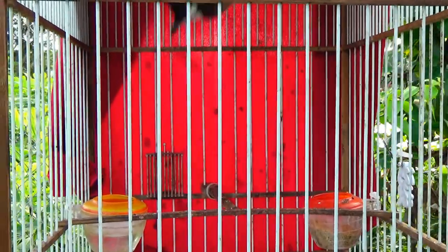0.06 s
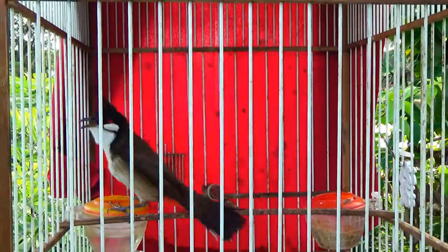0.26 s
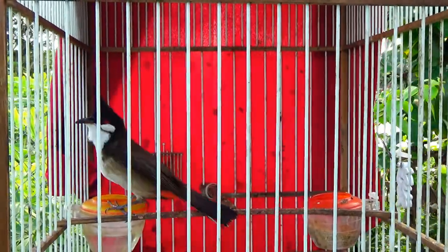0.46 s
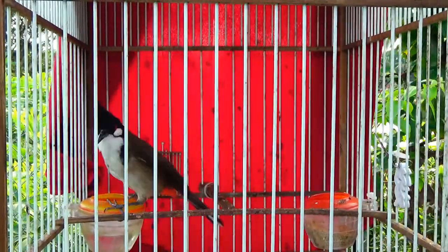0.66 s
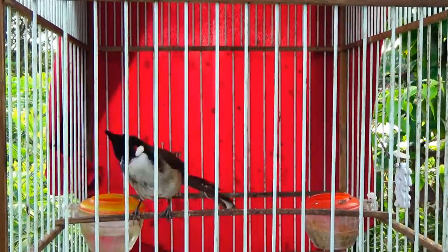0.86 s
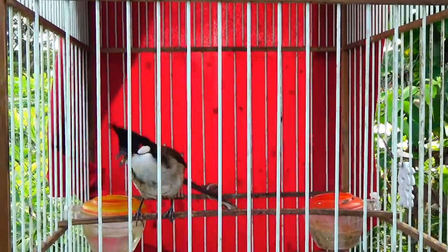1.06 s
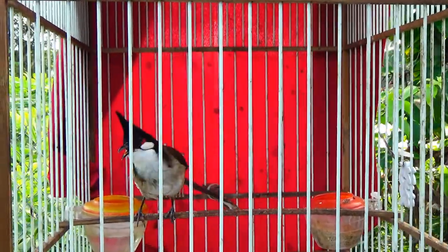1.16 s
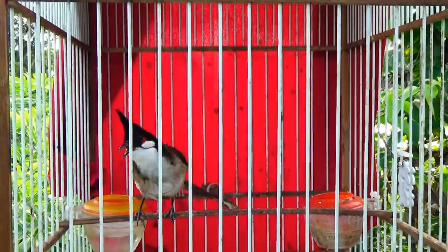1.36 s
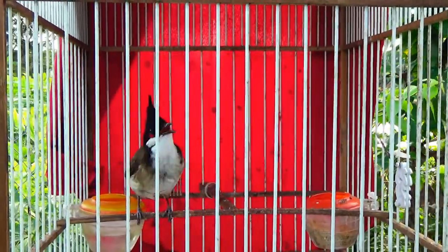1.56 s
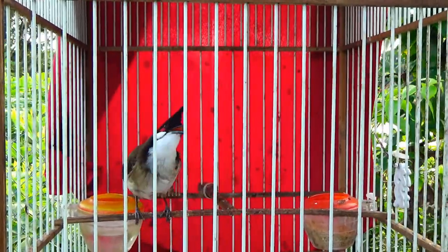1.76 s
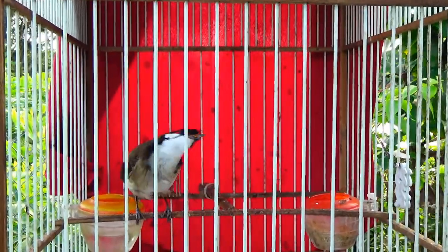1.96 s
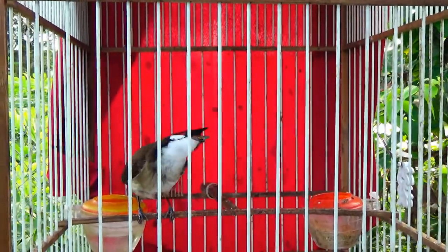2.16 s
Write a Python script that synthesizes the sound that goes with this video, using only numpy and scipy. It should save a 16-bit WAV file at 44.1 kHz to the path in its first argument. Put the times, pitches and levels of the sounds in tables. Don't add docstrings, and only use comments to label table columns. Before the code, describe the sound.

Songbird whistles a fast five-note phrase close by, with perch thuds, feather rustle and faint garden hum

```python
import sys
import numpy as np
from scipy import signal
from scipy.fft import rfft, irfft, next_fast_len
from scipy.io import wavfile
from scipy.ndimage import uniform_filter1d, minimum_filter1d, map_coordinates

SR = 44100
rng = np.random.default_rng(int(sys.argv[2]) if len(sys.argv) > 2 else 0)


def unload_audio(sound):
    columns = np.transpose(np.atleast_2d(sound))
    steps = np.round(np.clip(columns, -1, 1) * 32767)
    wavfile.write(sys.argv[1], SR, steps.astype(np.int16))


def attenuation_scalar(level_db):
    decades = np.asarray(level_db, float) / 20
    return 10 ** decades


N = 97020


def unit(x):
    return x / np.sqrt(np.mean(x ** 2) + 1e-20)


def along(points, hz):
    f, db = np.transpose(points)
    return np.interp(np.log(hz + 1), np.log(f + 1), db)


def wobble(rate):
    knots = rng.standard_normal(int(N * rate / SR) + 4)
    return map_coordinates(knots, [np.arange(N) * rate / SR])


def filtered(x, response):
    m = next_fast_len(x.shape[-1] + 8192)
    spectrum = rfft(x, m) * response(np.fft.rfftfreq(m, 1 / SR))
    return irfft(spectrum, m)[..., :x.shape[-1]]


def rush(spectrum, shape):
    noise = rng.standard_normal(shape)
    return unit(filtered(noise, lambda hz: attenuation_scalar(along(spectrum, hz))))


# f/Hz, level/dB per Hz
TRAFFIC_COLOUR = [(25, -18), (75, 0), (250, -5.5), (700, -10), (1500, -20.5), (4000, -27), (14000, -38),
                  (16000, -50)]
# t/s, level/dB
TRAFFIC_LEVEL = [(0.0, -45), (0.14, -46), (0.27, -49), (0.44, -52.5), (0.67, -51), (0.85, -51),
                 (1.49, -48.5), (1.84, -47.5), (2.2, -46.5)]


def traffic():
    z = signal.stft(rush(TRAFFIC_COLOUR, (2, N)), nperseg=1024)[2]
    patches = uniform_filter1d(rng.standard_normal(z.shape[1:]), size=8, axis=0)
    patches = uniform_filter1d(patches, size=5, axis=1)
    hum = signal.istft(z * attenuation_scalar(1.5 * unit(patches)), nperseg=1024)[1][:, :N]
    s, db = np.transpose(TRAFFIC_LEVEL)
    return hum * attenuation_scalar(np.interp(np.arange(N) / SR, s, db) + .6 * wobble(13))


# f/Hz, width/Hz, level/dB
WHINES = [(130.5, 25, -60), (241, 17, -60.5), (1230, 31.1, -75.5), (2389, 23, -69.5), (4740, 310, -61),
          (6200, 1100, -70.5)]


def whines():
    out = np.zeros(N)
    for hz, wide, db in WHINES:
        noise = rng.standard_normal(N)
        band = filtered(noise, lambda f: 1 / (1 + ((f - hz) / wide * 2) ** 4))
        out += attenuation_scalar(db + 0.88 * wobble(2.0)) * unit(band)
    return out


# centre t/s, length/s, f/Hz, level/dB
YAPS = [
    (0.509, 0.055, 420.6, -56.5),
    (1.427, 0.14, 429, -58),
    (1.744, .05, 425, -62.5),
]
YAP_HARMONICS = [5, 2.5, 2, -13.5, -10.5, -9.5, -13]


def dog():
    out, t = np.zeros(N), np.arange(N) / SR
    for at, long, hz, yap_db in YAPS:
        phase = 2 * np.pi * np.cumsum(hz * (1 - .3 * (t - at)) + 8 * wobble(60)) / SR
        stack = sum(attenuation_scalar(db) * np.sin((k + 1) * phase) for k, db in enumerate(YAP_HARMONICS))
        rasp = attenuation_scalar(4) * rush([(300, -24.0), (800, -1.5), (2800, -7.5), (5000, -28.0)], N)
        out += attenuation_scalar(yap_db) * np.exp(-((t - at) / long * 2) ** 2) * (stack + rasp)
    return out


# f/Hz, left over right level/dB
GARDEN_LEAN = [(30, 4), (110, 1.5), (300, 3), (800, 3.5), (2300, -0.5), (4400, 0.7), (7000, 2.5),
               (11000, 1)]


def garden():
    mid, side = traffic()
    mid = mid + whines() + dog()
    sides = np.array([[1], [-1]])
    leaning = filtered(mid, lambda hz: attenuation_scalar(along(GARDEN_LEAN, hz) / 2 * sides))
    return leaning + attenuation_scalar(-24) * side * sides


# delay t/s, level/dB
WALLS = [(.0045, -36.5), (.009, -29), (.014, -20.5), (.021, -26.5), (.026, -26.5)]
# f/Hz, level/dB
ECHO_COLOUR = [(300, 13), (1950, -7.5), (2350, -13), (3050, -5.5), (3400, -3), (4200, -8.5), (7000, -12),
               (16000, -21.5)]


def echoes(x):
    t = np.arange(SR // 2) / SR
    decay = 0
    for db, t60 in [(-22.5, .14), (-32.5, .55)]:
        decay = decay + attenuation_scalar(db - 60 * t / t60) * np.sqrt(6 * np.log(10) / (t60 * SR))
    noise = rng.standard_normal((2, len(t)))
    tail = (noise[0] + 0.15 * noise) * decay * (t > 0.003)
    tail += attenuation_scalar(-74 - 60 * t / 0.33) * np.sin(2 * np.pi * 3090 * t)
    for s, db in WALLS:
        tail[:, round(s * SR)] += attenuation_scalar(db)
    coloured = filtered(x, lambda hz: attenuation_scalar(along(ECHO_COLOUR, hz)))
    return signal.fftconvolve(coloured[None], tail, axes=1)[:, :N]


# centre t/s, length/s, level/dB
RUSTLES = [(0.053, 0.047, -51.5), (0.089, 0.037, -50), (0.153, 0.042, -50), (0.186, 0.01, -54.5),
           (0.21, 0.075, -40.5), (0.269, 0.057, -38.5), (0.317, .012, -50), (0.324, 0.037, -51.5),
           (0.343, 0.019, -49.5), (0.372, 0.024, -51), (0.551, 0.079, -55.5), (0.608, .008, -63),
           (0.773, 0.028, -53), (0.852, 0.11, -58), (.92, .03, -65.5), (1.453, 0.076, -63)]
# f/Hz, level/dB per Hz
FEATHER = [(880, -37.5), (1500, -3), (4320, -1), (4870, 1.5), (10600, -2.5), (16000, -11.5)]


def feathers():
    t = np.arange(N) / SR
    level = sum(attenuation_scalar(db) * np.exp(-((t - s) / long * 2) ** 2) for s, long, db in RUSTLES)
    grain = attenuation_scalar(3 * wobble(90) + 3 * wobble(400))
    return level * unit(grain * rush(FEATHER, N))


# t/s, peak level/dB, t60/s, rise/s, cane ring level/dB
CLAWS = [(0.1958, -13, 0.019, .002, -18), (.1968, -39, 0.006, .0005, -24), (0.198, -16, 0.012, 0.00088, -7),
         (0.23, -23.5, .02, .001, -22.5), (0.24, -35.5, .02, .002, -14), (0.251, -16.5, 0.026, 0.0018, -25),
         (0.2854, -17.5, 0.024, .001, -24), (.784, -25.5, 0.021, .002, -24),
         (0.7898, -12.5, 0.023, 0.00011, -19), (0.8192, -16, .014, 0.00032, -12),
         (0.8256, -19, 0.024, 0.002, -2), (0.8276, -16, 0.026, .001, -8), (.912, -42, 0.048, .004, -20)]
# f/Hz, level/dB per Hz
CLICK = [(1500, -55), (3600, -24), (5000, -9), (6400, -4), (8500, 0), (12000, -2), (14000, -9),
         (16000, -24)]
# f/Hz, level/dB, t60/s
CANE = [(6420, -7, .04), (5500, -18, .015), (8300, -14, .025), (9300, -18, .02), (11500, -18, .015)]


def claws():
    out, t = np.zeros(N), np.arange(SR // 8) / SR
    for s, db, t60, rise, ring_db in CLAWS:
        ring = 0
        for hz, mode_db, long in CANE:
            mode = np.sin(2 * np.pi * hz * (1 + 0.0099 * rng.normal()) * t)
            ring = ring + attenuation_scalar(mode_db + rng.normal(0, 2.1) - 60 * t / long) * mode
        tick = rush(CLICK, len(t)) * attenuation_scalar(-60 * t / t60) + attenuation_scalar(ring_db + 7) * ring
        out[round(s * SR):][:len(t)] += attenuation_scalar(db - 8) * (1 - np.exp(-t / max(rise, 1e-4))) * tick
    return out


# t/s, level/dB, t60/s
LANDING = [
    (0.193, -24.5, 0.015),
    (0.1966, -21, 0.015),
    (.205, -43, 0.03),
    (.212, -42, 0.094),
]
# f/Hz, level/dB per Hz
THUD = [(18, -34), (30, -11.5), (389, -0.5), (1100, -15), (1390, -5), (3000, -16.5), (3900, -23),
        (6600, -120)]


def landing():
    out, t = np.zeros(N), np.arange(SR // 8) / SR
    for s, db, t60 in LANDING:
        thud = np.minimum(t * 1000, 1) * rush(THUD, len(t))
        out[round(s * SR):][:len(t)] += attenuation_scalar(db - 60 * t / t60) * thud
    rumble = rush([(25, -3.0), (130, 0.5), (300, -15), (600, -59.0)], len(t))
    sway = attenuation_scalar(-36 - 60 * t / 0.31) * np.sin(np.pi * t / t[-1]) ** .5 * rumble
    out[round(LANDING[0][0] * SR):][:len(t)] += sway
    return out


def chattering_bar():
    at_s, hz, long_s = .9165, 8200, .016
    puff = np.exp(-((np.arange(N) / SR - at_s) / long_s * 2) ** 4)
    return attenuation_scalar(-53) * puff * rush([(hz * .85, -70), (hz, 0), (hz * 1.15, -70)], N)


# t/s, f/Hz, level/dB
NOTES = [
    [(.237, 2850, -29), (.241, 2913, -20), (.249, 2750, -16.5), (.26, 2867, -12), (.271, 3315, -12.5),
     (.277, 3665, -10), (.284, 3803, -10.5), (.296, 3815, -12), (.301, 3600, -39.5)],
    [(.3785, 2774, -19), (.383, 2684, -15), (.398, 2810, -10.5), (.412, 3210, -12.5), (.426, 3703, -7),
     (.434, 3806, -12), (.439, 3577, -13.5), (.446, 3755, -30), (.452, 3600, -36)],
    [(.5155, 2130, -27), (.521, 2384, -26), (.525, 2104, -18), (.541, 2237, -17), (.545, 1994, -23.5),
     (.549, 2150, -22)],
    [(.546, 2190, -34.5), (.55, 2863, -8.5), (.557, 2863, -7), (.563, 3070, -11.5), (.5765, 3047, -9.5),
     (.5812, 2940, -29), (.585, 3060, -21.5), (.593, 2960, -32)],
    [(.639, 2267, -40.5), (.647, 2307, -20.5), (.657, 2345, -14), (.697, 2378, -16.5), (.706, 2162, -19.5),
     (.72, 2005, -21.5), (.748, 1930, -23.5), (.7595, 1854, -34.5), (.772, 2060, -61)],
]
# warble f/Hz, depth/Hz, dip 0-1, crest t/s, deepest dips t/s, calming t/s
VOICE = [(164, 165, .27, .241, .252, .276), (164, 130, .22, .3828, .385, .42),
         (160, 25, .05, .52, .52, .55), (165, 90, .1, .5592, .556, .57), (130, 25, .26, .7085, .712, .75)]
OVERTONES = [
    [-30, -33, -54, -70, -80, -80],
    [-32, -35, -52, -70, -80, -80],
    [-35, -43, -41, -41, -46, -62],
    [-38, -48, -50, -64, -75, -80],
    [-36, -37, -37, -45, -45, -52],
]
# overtone growth/dB per kHz of pitch, halfway lines level/dB
RICHNESS = [(11, -50), (11, -52), (0, -44), (4, -55), (-13, -41)]
HALFWAY = [-6, 0, -11, -11, -12, -12]
# f/Hz, level/dB per Hz
BREATH = [(700, -24.5), (1400, -9.5), (3300, -2), (6000, -9.5), (13000, -9), (16000, -25)]


def bird():
    out, t = np.zeros(N), np.arange(N) / SR
    breath = attenuation_scalar(-45) * rush(BREATH, N)
    for rows, voice, overtones, (grow_db, half_db) in zip(NOTES, VOICE, OVERTONES, RICHNESS):
        s, hz, db = np.transpose(rows)
        rate_hz, depth_hz, dip, crest, deepest, calms = voice
        turn = 2 * np.pi * rate_hz * (t - crest) + .3 * wobble(80)
        swing = .5 + .5 * np.clip((calms - t) / 0.0037, 0, 1)
        pitch = np.interp(t, s, hz)
        warbled = pitch + depth_hz * swing * np.cos(turn) + 14 * wobble(300)
        phase = 2 * np.pi * np.cumsum(warbled) / SR
        bright_db = grow_db * (pitch - hz.max()) / 1000 + np.minimum(np.interp(t, s, db) + 29, 0)
        tone = (1 + attenuation_scalar(-37.5) * wobble(2500)) * np.sin(phase) + breath
        for k, (over_db, line_db) in enumerate(zip(overtones, HALFWAY)):
            multiple = (k + 2) * pitch
            level = attenuation_scalar(over_db + bright_db + 2.5 * wobble(150)) * (multiple < 14500)
            tone += level * np.sin((k + 2) * phase)
            level = attenuation_scalar(half_db + line_db + (k > 1) * bright_db + 3 * wobble(90))
            tone += level * np.sin((k + .5) * phase)
        gate = np.clip(np.minimum(t - s[0], s[-1] - t) / 0.0029, 0, 1)
        lifted_db = db + 9 * attenuation_scalar(db - db.max())
        fade = 1 / (1 + ((t - deepest) / .016) ** 4)
        dips = np.abs(1 - dip * fade * (1 - np.cos(turn - .3)) ** 2 / 2)
        out += np.sqrt(2) * attenuation_scalar(np.interp(t, s, lifted_db)) * gate * dips * tone
    return out


def lean(left_db):
    return attenuation_scalar([[left_db / 2], [-left_db / 2]])


def scene():
    song = bird()
    feet = claws() + landing() + chattering_bar()
    voice = (song + echoes(song + feet)) * lean(.9)
    return voice + feet * lean(1.6) + feathers() * lean(.3) + garden()


def low_pass(x):
    return signal.sosfilt(signal.butter(12, 16120, fs=SR, output="sos"), x)


def record(dry):
    limit_db, hardness, hold_s, smooth_s, top_hz = -12, 3.55, 0.003, 0.0033, 16120
    size = np.abs(signal.hilbert(dry.mean(axis=0), next_fast_len(N))[:N])
    need = (1 + (size / attenuation_scalar(limit_db + 3)) ** hardness) ** (-1 / hardness)
    held = minimum_filter1d(need, int(hold_s * SR))
    gain = uniform_filter1d(held, int(smooth_s * SR))
    mix = filtered(dry * gain, lambda hz: hz < top_hz)
    return low_pass(mix)


dry = scene()
out = record(dry)
unload_audio(out)
```